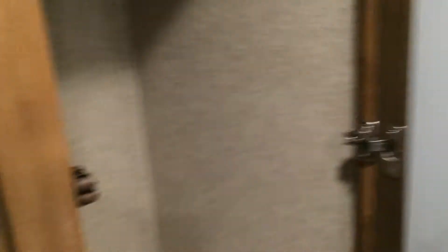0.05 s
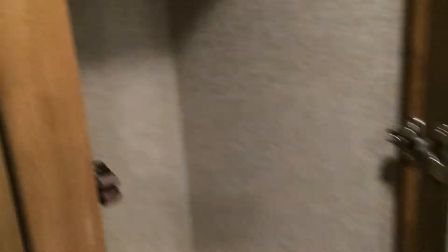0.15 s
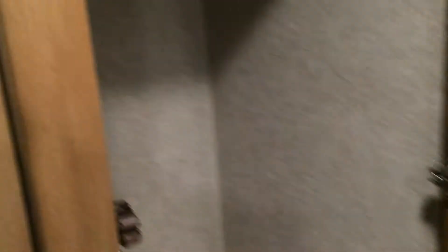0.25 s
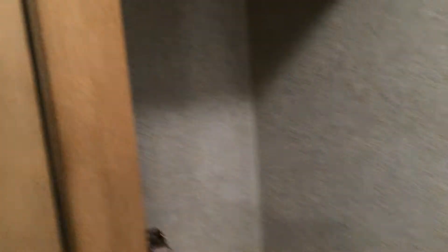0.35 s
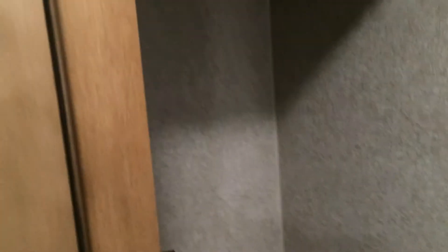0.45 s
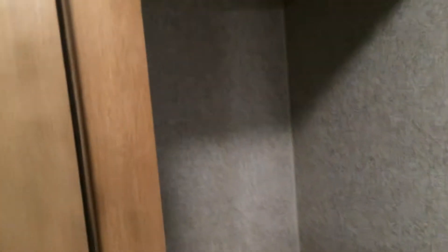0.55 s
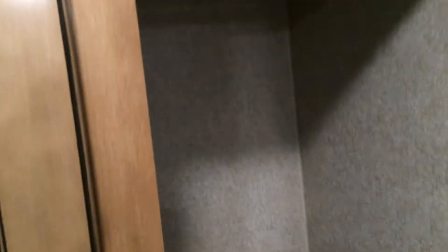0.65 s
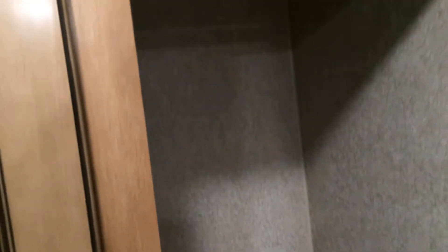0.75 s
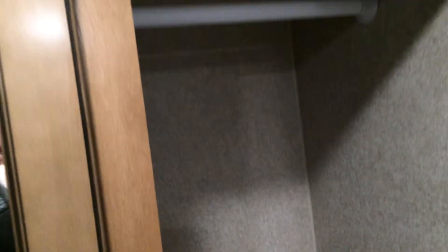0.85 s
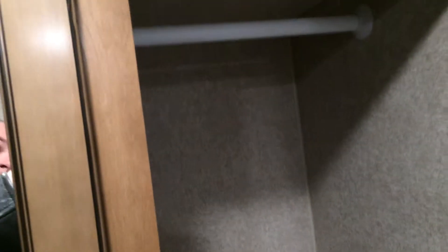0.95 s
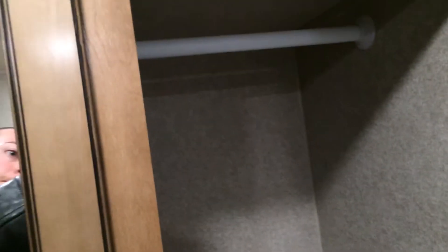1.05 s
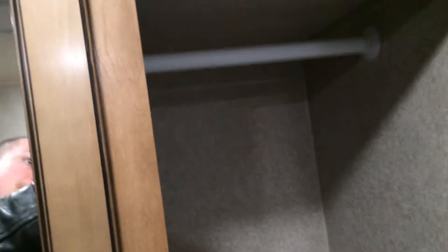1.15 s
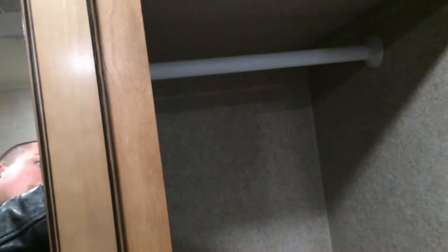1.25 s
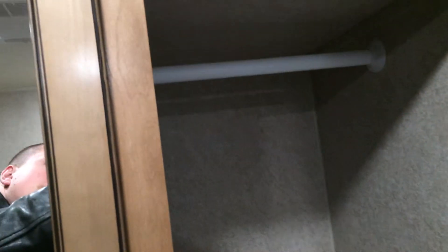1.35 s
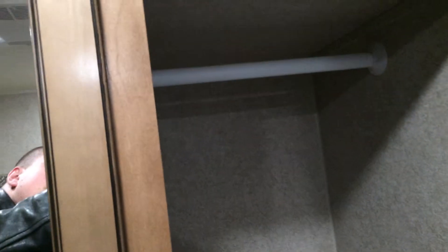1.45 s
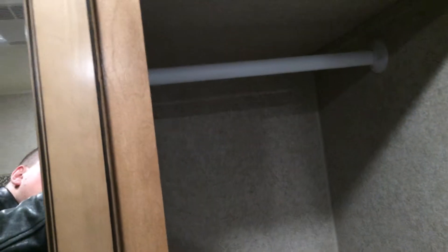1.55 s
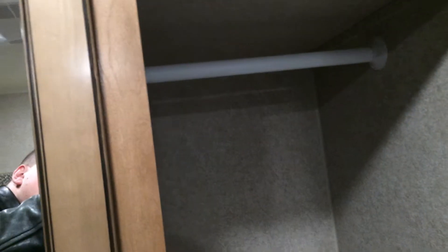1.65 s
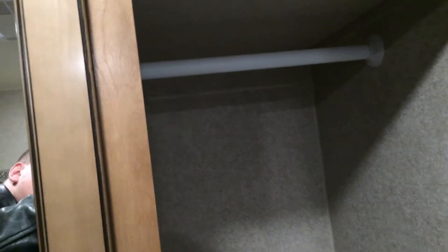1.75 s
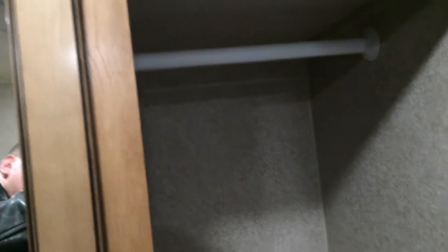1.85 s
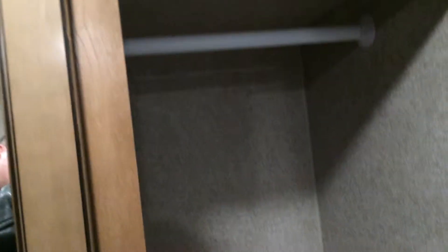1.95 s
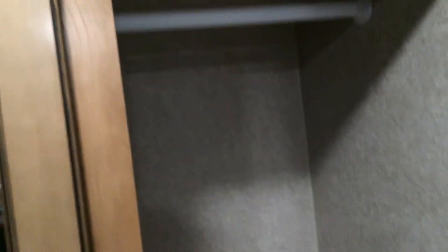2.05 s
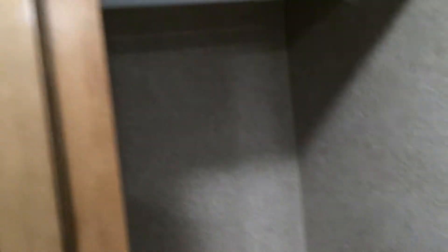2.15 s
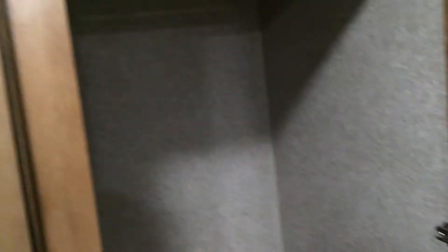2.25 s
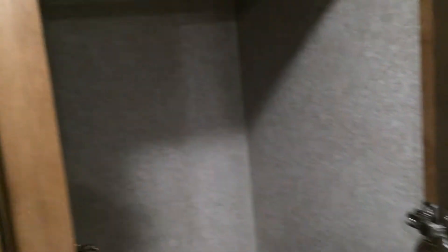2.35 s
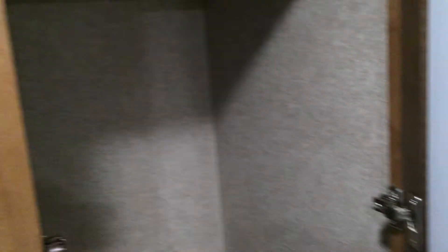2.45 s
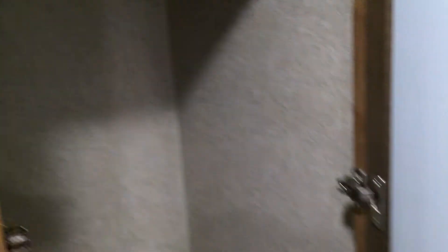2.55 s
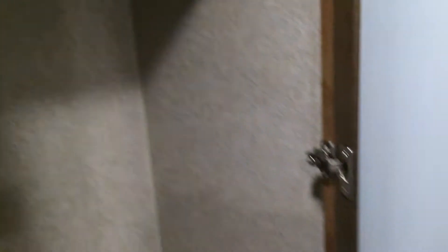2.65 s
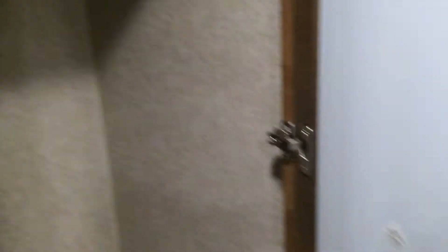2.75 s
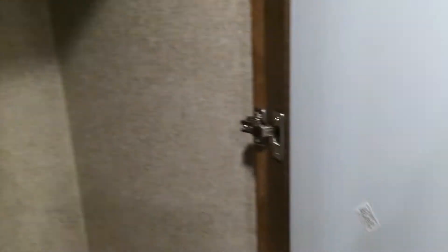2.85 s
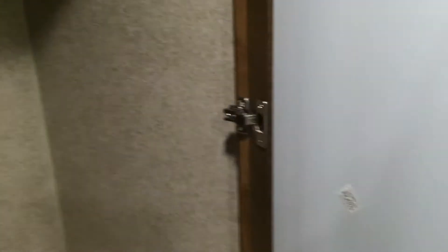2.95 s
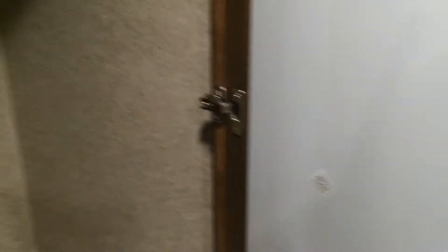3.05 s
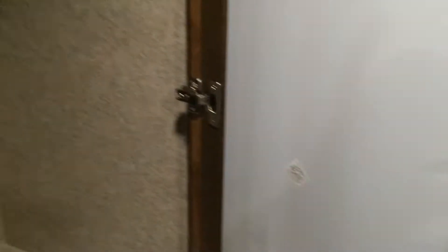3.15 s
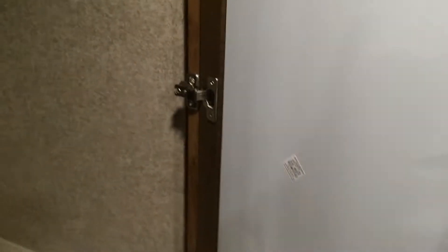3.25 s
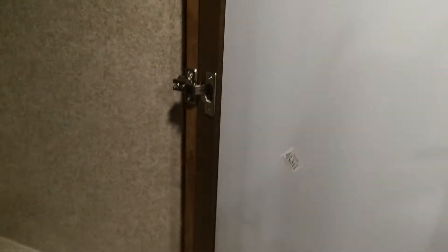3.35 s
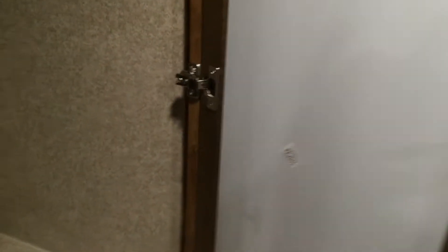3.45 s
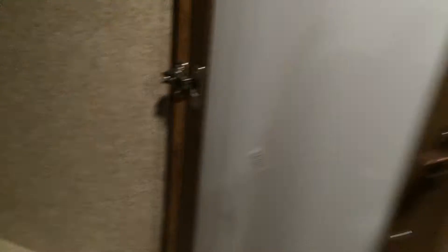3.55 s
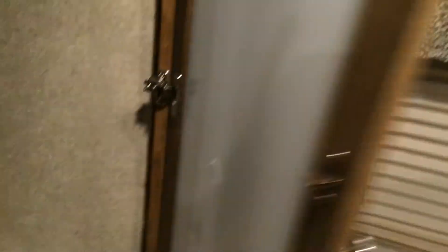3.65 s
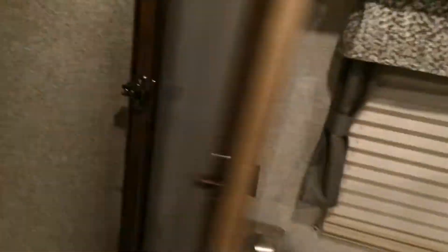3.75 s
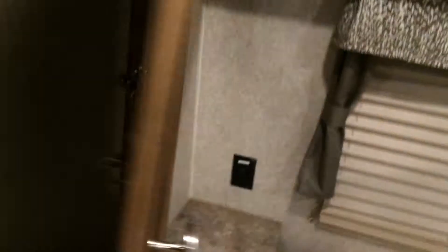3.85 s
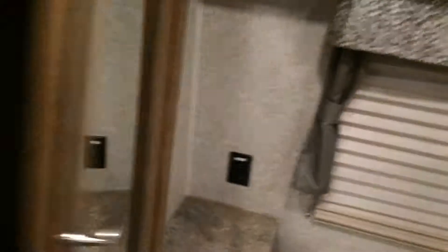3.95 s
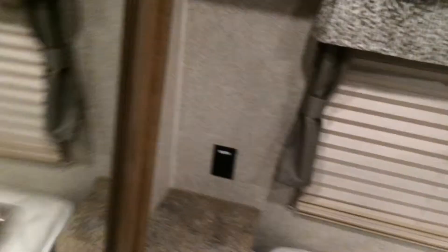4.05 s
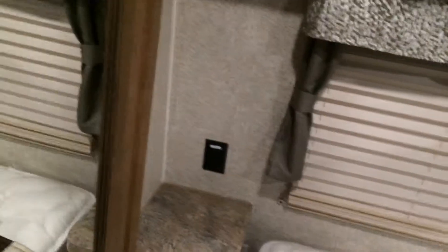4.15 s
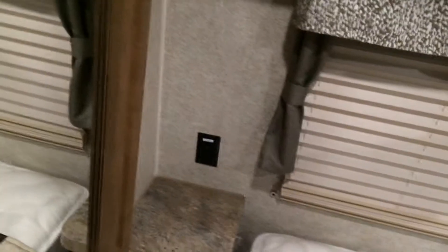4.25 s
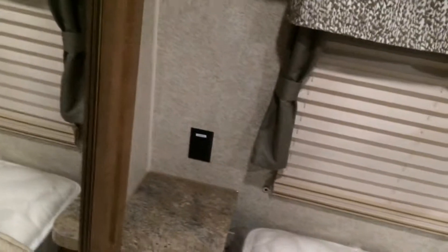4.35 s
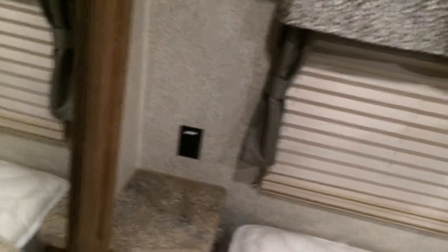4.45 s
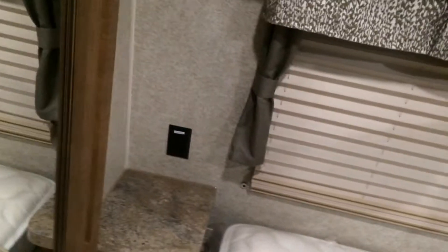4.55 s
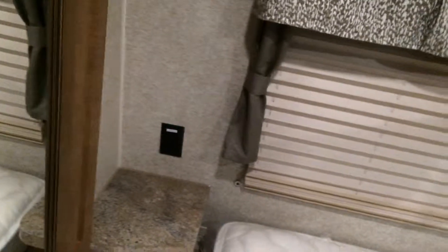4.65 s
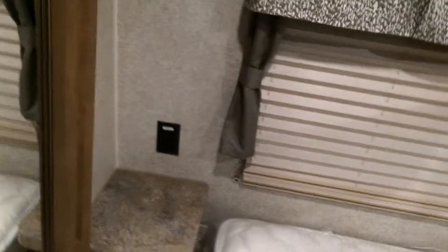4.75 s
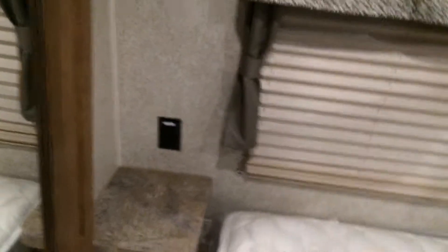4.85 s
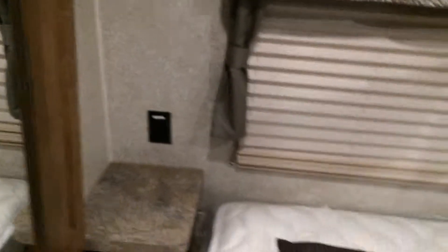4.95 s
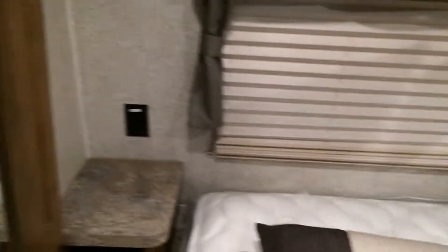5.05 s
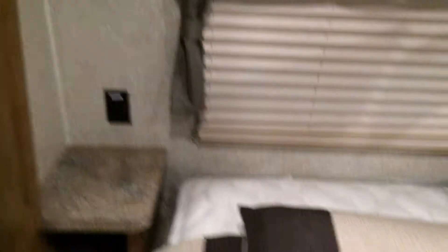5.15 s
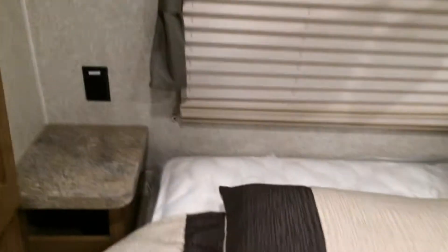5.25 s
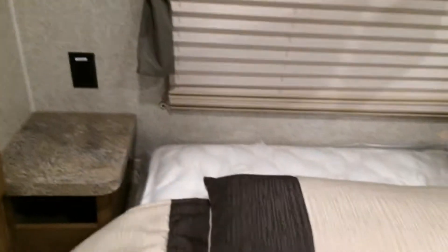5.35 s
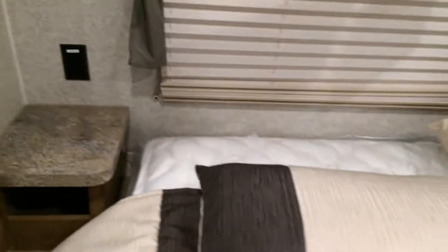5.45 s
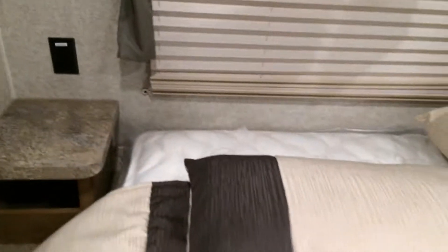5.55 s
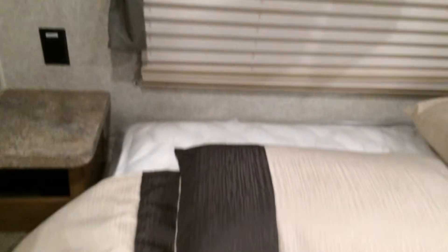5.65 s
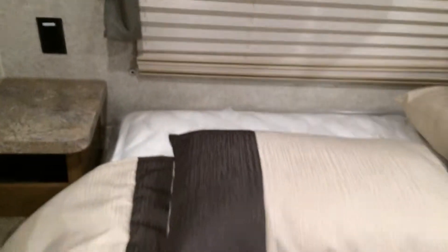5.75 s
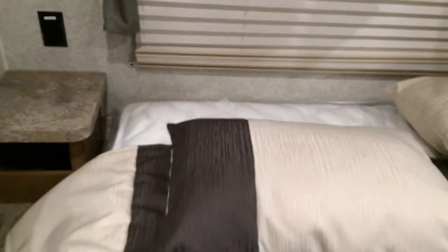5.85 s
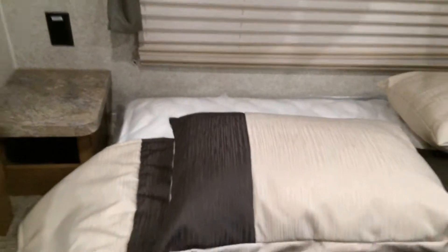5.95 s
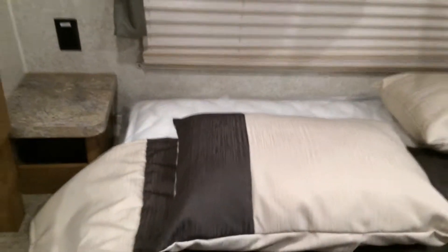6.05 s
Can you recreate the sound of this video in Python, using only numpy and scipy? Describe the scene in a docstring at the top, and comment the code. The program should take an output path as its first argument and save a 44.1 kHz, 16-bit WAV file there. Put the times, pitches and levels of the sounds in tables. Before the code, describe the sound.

A close microphone picks up a soft handling bump, then quiet footsteps, cloth rustle and scattered light ticks over the faint hush of a small trailer. Past the middle, a catch scrapes and a wooden wardrobe door cracks against its frame, by far the loudest sound. The cabinet rings briefly and a dull shudder fades while the slow steps and rustling continue.

```python
"""The bedroom of a small trailer, heard from one close microphone over a faint room hush.
After a soft handling bump, someone walks slowly on the hollow floor; clothes rustle, handled things tick.
Past 2.5 s a sleeve rasps along wood, and from 3.65 s a wooden wardrobe door swings, pushing air ahead.
At 4.2 s the catch scrapes, the door cracks against its frame and light cabinet and cabin boom briefly.
The steps and rustling go on while the trailer's shudder dies away."""
import sys
import numpy as np
from scipy import signal
from scipy.fft import rfft, irfft, next_fast_len
from scipy.io import wavfile

SR = 44100
rng = np.random.default_rng(int(sys.argv[2]) if len(sys.argv) > 2 else 0)


def unload_wav(signal):
    """Save mono or channel-first audio to the path in sys.argv[1] as 16-bit WAV at rate SR, clipped to [-1, 1]."""
    wavfile.write(
        sys.argv[1],
        SR,
        np.round(np.clip(np.atleast_2d(signal).T, -1, 1) * 32767).astype(np.int16),
    )


N = 268613
T = np.arange(N) / SR
SWING_S, SLAM_S = 3.65, 4.243   # the door starts to swing, then meets its frame

# Room tone and the floor's rumble. Each row: frequency in Hz, relative level in dB.
HUSH_SPECTRUM = [(25, -4.5), (70, 3), (150, -7), (330, -4.5), (700, -6), (1900, -18.5), (3000, -31),
                 (6000, -26.5), (12000, -29), (15000, -42)]
RUMBLE_SPECTRUM = [(25, -11.5), (55, 2), (90, -1), (180, -9), (300, -22), (900, -46)]
# How briskly the walker moves. Each row: time in seconds, relative level of rubbing cloth in dB.
MOVEMENT = [(0.0, -46.5), (0.28, -52.5), (0.64, -51), (0.98, -56.5), (1.46, -62.5), (1.63, -68.5),
            (2.2, -70), (2.34, -59), (2.73, -57), (2.86, -60), (3.66, -67), (4.19, -60.5), (4.55, -67.5),
            (4.814, -62), (5.304, -48), (5.6, -51.5), (5.788, -63), (6.09, -61.5)]
# Strokes of sleeves and soles. Each row: peak time and half length in seconds, rub and swish in dB.
SCUFFS = [(0.089, 0.044, -37.5, -47), (0.514, 0.051, -43.5, -54), (.69, .035, -48, -61),
          (1.37, 0.048, -61.5, -69), (1.546, .0093, -53.5, -58.5), (1.919, 0.013, -54, -61),
          (2.177, 0.02, -56.5, -62), (2.594, 0.013, -52, -54), (2.737, 0.046, -62, -59.5),
          (2.853, 0.035, -56, -56.5), (3.272, 0.073, -58, -67), (3.454, 0.019, -78, -66),
          (3.75, 0.053, -66, -65), (4.125, .015, -51.5, -80), (4.892, 0.019, -55.5, -67),
          (5.43, 0.059, -59, -52), (5.753, 0.039, -46.5, -59.5), (6.047, .012, -55, -63.5)]
# The dull rub and bright swish of cloth. Each row: frequency in Hz, relative level in dB.
RUB_SPECTRUM = [(70, -16.5), (130, -0.5), (200, -1), (320, -3.5), (530, -8.5), (850, -9), (1400, -6),
                (2300, -6), (2900, -14), (4000, -15.5), (5500, -26), (8000, -56.5)]
SWISH_SPECTRUM = [(1500, -22), (3000, -0.5), (4200, -2.5), (6500, -4), (8500, -8.5), (12000, -16),
                  (15000, -23)]
# A sleeve along the wood. Each row: peak time and half length in seconds, level in dB.
SLEEVE_SCRAPES = [(2.532, 0.023, -55), (2.733, 0.061, -53.5)]
# The clearer knocks of handling. Each row: start in seconds, relative level in dB, pitch in Hz,
# relative treble in dB, t60 in seconds.
HANDLING_TICKS = [(0.1961, -33, 2370, -9, 0.12), (0.2705, -44, 1600, 2, .021), (.341, -43, 874, 1.5, 0.027),
                  (.479, -35.5, 800, -10, 0.047), (0.9039, -38.5, 377, -21, 0.087),
                  (1.148, -45.5, 1680, -19, 0.08), (1.2047, -43, 2170, -24, .027),
                  (1.400, -42, 1370, -15, 0.12), (1.5361, -48, 1460, -1, 0.026),
                  (1.6315, -43.5, 1180, -40, 0.026), (1.838, -43, 670, -13.5, 0.064),
                  (2.1794, -43, 494, -22, 0.056), (2.2503, -38, 2020, -.5, .03),
                  (2.357, -50.5, 1700, 0, 0.049), (2.577, -35.5, 2280, -4.5, 0.094),
                  (3.057, -47, 2000, -4, 0.11), (3.2768, -44.5, 1870, -11, 0.031),
                  (3.57, -47.5, 2300, -6.5, 0.054), (3.647, -45, 1740, -20, 0.086),
                  (3.7672, -49.5, 1350, 0.5, 0.05), (3.8477, -47, 610, -10.5, 0.047),
                  (4.0113, -41.5, 780, -15, .065), (4.0371, -36.5, 1730, -26, 0.024),
                  (4.481, -38.5, 3000, -26, 0.014), (4.8454, -46.5, 1090, -2.5, 0.06),
                  (5.173, -37.5, 2350, -6, 0.051), (5.4265, -35.5, 2360, -2.5, 0.05),
                  (5.7186, -42, 2470, -12, .036)]
# The thin panelling behind every tick. Each row: frequency in Hz, relative level in dB.
PANELLING_SPECTRUM = [(100, -19), (300, -2), (650, -1.5), (1200, -2), (1700, 6.5), (2350, 4.5), (2900, -7),
                      (5000, -9), (9000, -37), (15000, -38)]
# Low thuds: a soft handling bump at the start, then heels landing.
# Each row: start in seconds, push in dB, contact time in seconds.
LOW_THUDS = [(.055, -48.5, .002), (.660, -39.5, 0.0064), (1.533, -45.5, 0.0042), (2.337, -45, 0.0091),
             (3.062, -52, 0.0048), (3.422, -34, 0.012), (4.091, -43.5, 0.0074), (4.544, -45.5, 0.0069),
             (5.305, -42.5, 0.0061), (5.715, -47, 0.004)]
# The hollow floor. Each row: frequency in Hz, relative level in dB, t60 in seconds.
FLOOR_MODES = [(49, -2.5, 0.16), (57.8, 2, 0.55), (76.8, -0.5, 0.51), (87.5, 7, 0.26), (114.8, -2, 0.45),
               (138.1, -2, 0.71), (168.3, -1.5, 0.48), (204, -22, .22)]
# The catch jerking home. Each row: start in seconds, level in dB.
CATCH_SLIPS = [(4.2217, -28), (4.2242, -19), (4.2272, -13), (4.2327, -17)]
# The grit of the catch. Each row: frequency in Hz, relative level in dB.
CATCH_SPECTRUM = [(200, -17), (400, -12), (1100, -4), (1700, -4), (2100, -8), (2800, 0), (3350, -3.5),
                  (3900, -8), (4500, -21), (6300, -16), (8000, -24), (15000, -36)]
# The door pushes air, then shoves the cabinet. Each row: start in seconds, push in dB, contact in seconds.
DOOR_SHOVES = [(4.203, -38, 0.0014), (4.2295, -19.5, 0.0029), (4.2425, -20.5, 0.0025),
               (4.2605, -28.5, .003), (4.2783, -20, 0.001)]
# The boom of cabinet and cabin. Each row: frequency in Hz, relative level in dB, t60 in seconds.
BOOM_MODES = [(34, -8.5, .25), (45, -7.5, .25), (55.4, -1, 0.46), (73.6, -9.5, .3), (87.5, -2, 0.32),
              (112.2, 3, .18), (137.7, -.5, .25), (161.5, -2.5, .2), (183.8, -1, 0.25), (204.5, -1, .27),
              (250.6, -12.5, 0.22), (317.2, -16, 0.37)]
# Door panel and hinges. Each row: frequency in Hz, level in dB.
DOOR_MODES = [(238, -25), (270, -21.5), (294, -31.5), (385, -31), (489, -28.5), (768, -30.5), (856, -25.5),
              (949, -33), (1081, -32.5), (1198, -22), (1283, -26), (1389, -27.5), (1501, -29.5),
              (1608, -29.5), (1711, -31), (1858, -28.5), (2148, -28), (2406, -30.5), (2828, -31.5),
              (2871, -29.5), (3252, -30.5), (3930, -39.5), (4122, -28), (4206, -30), (5150, -31)]
# How long the cabinet rings. Each row: band centre in Hz, t60 in seconds.
CABINET_DECAY = [(250, .33), (380, .35), (550, .28), (900, .29), (1400, .32), (2300, .25), (2900, .14),
                 (3500, .29), (4800, .29), (6500, .245), (8500, .19), (13000, .16)]
# The slam: crack on the frame, dense cabinet ring, buzz of hinges and catch, dull shudder of the trailer.
# Each row: frequency in Hz, relative level in dB.
CRACK_SPECTRUM = [(240, -6.5), (400, 2.5), (600, -13), (1200, -0.5), (2300, 4), (2870, -7), (4070, 2.5),
                  (5400, -4.5), (6300, 1.5), (7500, -8), (10000, -21.5), (13000, -28.5), (15000, -33)]
CABINET_SPECTRUM = [(140, -20), (240, 2), (350, -5.5), (550, -3), (850, 1), (1020, -6.5), (1300, -5.5),
                    (2200, -6), (2800, -13.5), (3500, -10), (4500, -8.5), (5600, -12.5), (6500, -15.5),
                    (9500, -21), (15000, -43)]
HARDWARE_SPECTRUM = [(2900, -33), (3400, 4), (4600, 1), (5600, -6.5), (7000, -15), (10000, -30)]
SHUDDER_SPECTRUM = [(25, -13), (45, -9.5), (65, 6), (90, 7.5), (130, -5), (200, -24.5), (400, -69)]


def from_db(db):
    """Decibels to gain."""
    return 10 ** (np.asarray(db) / 20)


def rms_one(x):
    """Scale to unit power."""
    return x / np.sqrt(np.mean(x ** 2) + 1e-20)


def add(out, s, sound):
    """Mix a sound in from time s."""
    at = max(round(s * SR), 0)
    out[at:at + len(sound)] += sound[:N - at]


def dying(t60):
    """One second of exponential decay, falling 60 dB in t60 seconds."""
    return from_db(-60 * T[:SR] / t60)


def burst(envelope):
    """One second of noise under an envelope."""
    return rng.standard_normal(SR) * envelope


def stroke(s, half):
    """A smooth swell and fade around time s."""
    return np.exp(-.5 * np.minimum(np.abs(T - s) / half, 10) ** 2)


def drift(turns_per_s):
    """A random wander of unit power."""
    knots = rng.standard_normal(2000)
    return rms_one(np.interp(T * turns_per_s, np.arange(len(knots)), knots))


def coloured(x, spectrum, size=4096):
    """Pass x through a causal (minimum-phase) filter of unit energy with the given spectrum."""
    hz, db = np.transpose(spectrum)
    grid = np.maximum(np.arange(size // 2 + 1) * SR / size, 1)
    gain = from_db(np.interp(np.log(grid), np.log(hz), db))
    cepstrum = irfft(np.log(gain))
    cepstrum[1:size // 2] *= 2
    cepstrum[size // 2 + 1:] = 0
    response = irfft(np.exp(rfft(cepstrum)))
    return signal.fftconvolve(x, response / np.sqrt(np.sum(response ** 2)))[:len(x)]


def bands(x, centres_hz):
    """Split a sound into overlapping bands that add up to the whole."""
    spectrum = rfft(x)
    log_hz = np.log(np.arange(len(spectrum)) * SR / len(x) + 1)
    weights = [np.interp(log_hz, np.log(centres_hz), row) for row in np.eye(len(centres_hz))]
    return [irfft(spectrum * weight, len(x)) for weight in weights]


def ringing(modes):
    """Impulse response of a body; neighbouring modes swing in opposite directions."""
    return sum((-1) ** k * from_db(db) * dying(t60) * np.sin(2 * np.pi * hz * T[:SR])
               for k, (hz, db, t60) in enumerate(modes))


def thumps(pushes, modes):
    """Soft pushes into a body: the longer the contact, the duller the thump."""
    force = np.zeros(N)
    for s, db, contact in pushes:
        push = np.sin(np.pi * np.minimum(T[:SR] / contact, 1)) ** 2
        add(force, s, from_db(db) * push / push.sum())
    return signal.fftconvolve(force, ringing(modes))[:N]


def movement_db(s):
    """How briskly the walker moves at time s."""
    return np.interp(s, *np.transpose(MOVEMENT))


def room_tone(hush_db=-65.5, rest_db=-66.5, swing_db=-54.5, stir_db=-11.5, tremble_t60=.67, sway_db=2):
    """A steady hush, and an uneven rumble stirred by shifting weight, low thuds and the swinging door."""
    hush = from_db(hush_db) * coloured(rng.standard_normal(N), HUSH_SPECTRUM)
    power = from_db(rest_db) ** 2 + from_db(movement_db(T) + stir_db) ** 2
    power += from_db(swing_db) ** 2 * ((T > SWING_S) & (T < SLAM_S))
    for s, db, _ in LOW_THUDS:
        add(power, s, (from_db(db + stir_db) * dying(tremble_t60)) ** 2)
    sway = from_db(sway_db * drift(7.4))
    return hush + np.sqrt(power) * sway * coloured(rng.standard_normal(N), RUMBLE_SPECTRUM)


def cloth_folds(rub, depth_db=2.1):
    """Folds of cloth open and close, so each band of the rub swells on its own."""
    padded = np.pad(rub, (0, next_fast_len(N) - N))
    centres_hz = np.geomspace(300, 5000, 14)
    return sum(band[:N] * from_db(depth_db * drift(35)) for band in bands(padded, centres_hz))


def clothes(creases_per_s=160, crease_db=-3, spread_db=4, flutter_db=1.23, rub_gain_db=-4):
    """Cloth slides with a smooth rub and a brighter swish, peppered by tiny slipping creases."""
    rub_level = from_db(movement_db(T) + 3)
    swish_level = rub_level * from_db(-11.5)
    for s, half, rub_db, swish_db in SCUFFS:
        swell = stroke(s, half)
        rub_level = np.hypot(rub_level, from_db(rub_db) * swell)
        swish_level = np.hypot(swish_level, from_db(swish_db) * swell)
    sizes = from_db(spread_db * np.minimum(rng.exponential(1, N), 4)) * rng.choice([-1, 1], N)
    creases = from_db(crease_db) * rms_one(sizes * (rng.random(N) < creases_per_s / SR))
    friction = from_db(flutter_db * drift(60)) * (rng.standard_normal((2, N)) + creases)
    rub = coloured(rub_level * cloth_folds(friction[0]), RUB_SPECTRUM)
    swish = coloured(swish_level * friction[1], SWISH_SPECTRUM)
    return from_db(rub_gain_db) * rub + swish


def sleeve_scrapes(wood_hz=1870, q=3.8, rough_db=3, slips_per_s=120):
    """A sleeve's uneven friction through one resonance of the wood: a dry, nasal rasp."""
    friction = rng.standard_normal(N) * from_db(rough_db * drift(slips_per_s))
    rasp = signal.lfilter(*signal.iirpeak(wood_hz, q, fs=SR), friction)
    return rms_one(rasp) * sum(from_db(db) * stroke(s, half) for s, half, db in SLEEVE_SCRAPES)


def faint_ticks(count=20, low_hz=900, high_hz=2400, spread_db=4, treble_db=-9, t60=.03):
    """Small chance contacts, stronger while the walker moves briskly; rows as in HANDLING_TICKS."""
    draws = rng.uniform([0, -1, low_hz], [T[-1], 1, high_hz], (count, 3))
    return [(s, movement_db(s) - 1 + spread_db * strength, hz, treble_db, t60) for s, strength, hz in draws]


def handling(knock_q=4.5, cabin_t60=.22, panelling_follows=.13):
    """Each tick is a pitched knock, a clack of panelling and a bright snap, with a short cabin tail."""
    knocks, clacks, snaps = np.zeros((3, N))
    attack = from_db(4) * dying(.0024)
    tail = from_db(-18) * dying(cabin_t60)
    for s, db, hz, treble_db, t60 in HANDLING_TICKS + faint_ticks():
        grit = from_db(db) * rng.standard_normal((3, SR)) * (dying(t60) + attack + tail)
        knock = signal.lfilter(*signal.iirpeak(hz, knock_q, fs=SR), grit[0])
        band_share = np.pi * hz / (knock_q * SR)   # power that the resonance lets through
        add(knocks, s, knock / np.sqrt(band_share))
        add(clacks, s, from_db(panelling_follows * treble_db) * grit[1])   # soft contacts clack less
        add(snaps, s, from_db(treble_db) * grit[2])
    knocks = signal.sosfilt(signal.butter(2, 4000, fs=SR, output="sos"), knocks)
    clacks = coloured(clacks, PANELLING_SPECTRUM)
    snaps = coloured(snaps, SWISH_SPECTRUM)
    return from_db(-7) * knocks + from_db(-6) * (clacks + snaps)


def bump_and_footsteps(lag_s=.052, second_db=-5, softer=1.23):
    """Each thud rings the hollow floor and a weaker, softer push follows: in a step, heel then sole."""
    second_pushes = [(s + lag_s, db + second_db, contact * softer) for s, db, contact in LOW_THUDS]
    return thumps(LOW_THUDS + second_pushes, FLOOR_MODES)


def door_catch(slip_t60=.014, click_db=-26, click_t60=.0055):
    """The catch touches with a bright click, then slips home in a few quick, gritty jerks."""
    slips, click = np.zeros((2, N))
    tail = from_db(-23) * dying(.08)
    for s, db in CATCH_SLIPS:
        add(slips, s, from_db(db) * burst(dying(slip_t60) + tail))
    add(click, CATCH_SLIPS[0][0], from_db(click_db) * burst(dying(click_t60) + 2 * tail))
    return coloured(slips, CATCH_SPECTRUM) + click


def cabinet_ring(echo_s=.03, echo_width_s=.023):
    """Countless modes die away band by band; the near walls throw back a cluster of first echoes."""
    echoes = from_db(-5) * burst(np.exp(-((T[:SR] - echo_s) / echo_width_s) ** 2))
    centres_hz, t60s = np.transpose(CABINET_DECAY)
    noise_bands = bands(rng.standard_normal(SR), centres_hz)
    ring = sum(band * dying(t60) for band, t60 in zip(noise_bands, t60s))
    return coloured(ring + echoes, CABINET_SPECTRUM)


def door_slam(snap_t60=.0065, crack_t60=.016, shudder_t60=1.71, hardware_t60=.42):
    """Wood cracks on wood: panel and cabinet ring, hardware buzzes, the trailer booms and shudders."""
    blow = from_db(-14) * dying(snap_t60) + from_db(-8) * dying(crack_t60)
    crack = coloured(burst(blow), CRACK_SPECTRUM)
    cabinet = from_db(-23) * cabinet_ring()
    shudder = from_db(-35) * coloured(burst(dying(shudder_t60)), SHUDDER_SPECTRUM)
    hardware = from_db(-34) * coloured(burst(dying(hardware_t60)), HARDWARE_SPECTRUM)
    # t60 is 0.2 s at 1 kHz; higher modes die sooner
    panel = ringing([(hz, db, .2 * (1000 / hz) ** .15) for hz, db in DOOR_MODES])
    out = thumps(DOOR_SHOVES, BOOM_MODES)
    add(out, SLAM_S, crack + cabinet + panel + hardware + shudder)
    return out


def scene():
    """Door, walker and room tone at one close microphone."""
    door = door_catch() + door_slam()
    return (door + bump_and_footsteps() + handling() + clothes() + sleeve_scrapes() + room_tone())[None]


def record(dry, low_cut_hz=18, high_cut_hz=15250):
    """The microphone sheds the deepest bass, the highest peaks are rounded and the top is cut."""
    low_cut = signal.butter(2, low_cut_hz, "high", fs=SR, output="sos")
    high_cut = signal.ellip(10, .1, 80, high_cut_hz, fs=SR, output="sos")
    rounded = np.tanh(signal.sosfilt(low_cut, dry))
    return signal.sosfilt(high_cut, rounded)


dry = scene()
out = record(dry)
unload_wav(out)
```